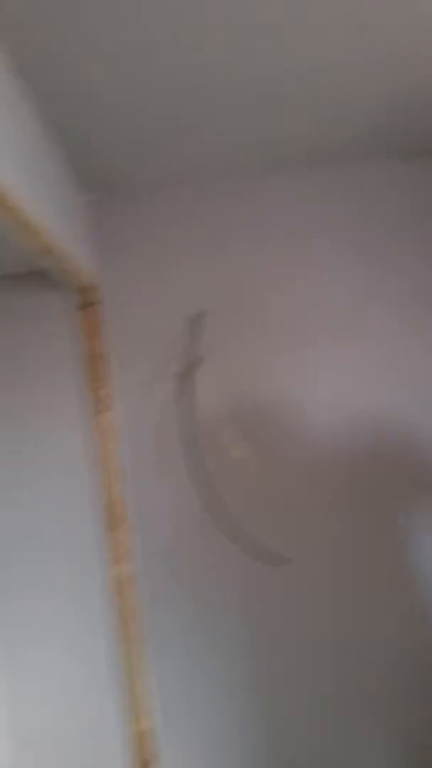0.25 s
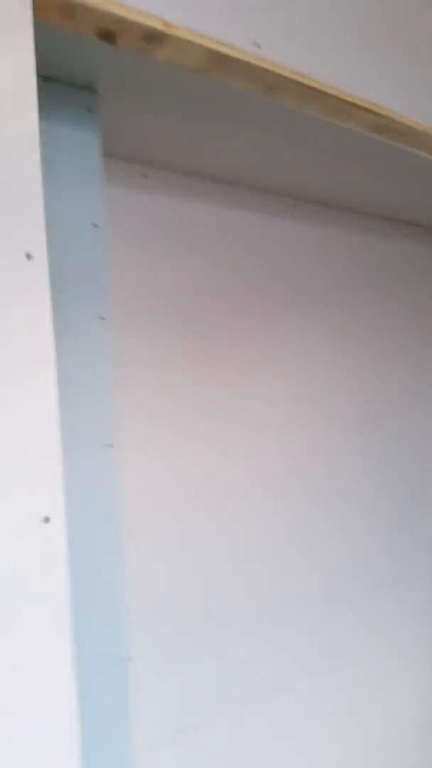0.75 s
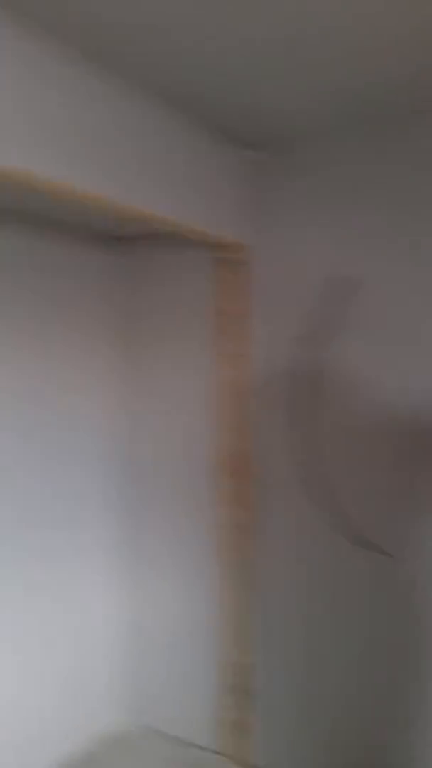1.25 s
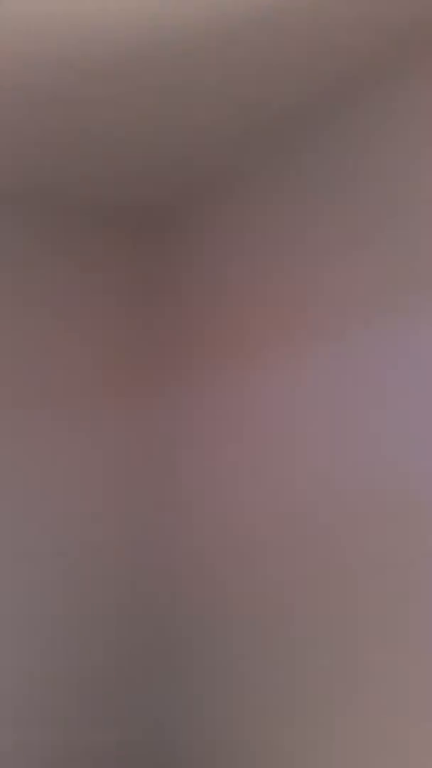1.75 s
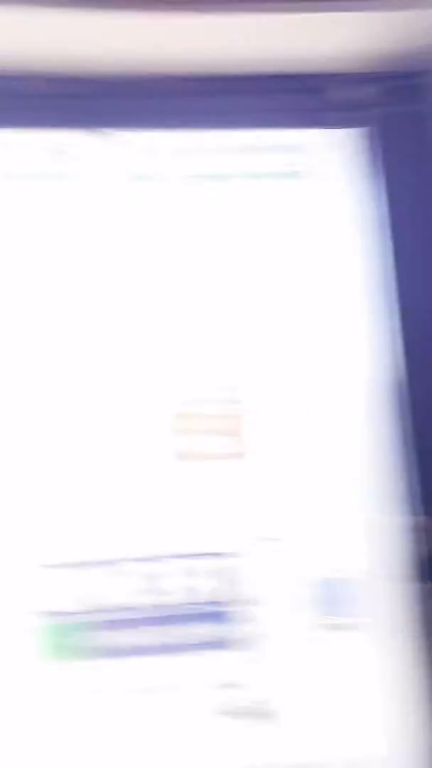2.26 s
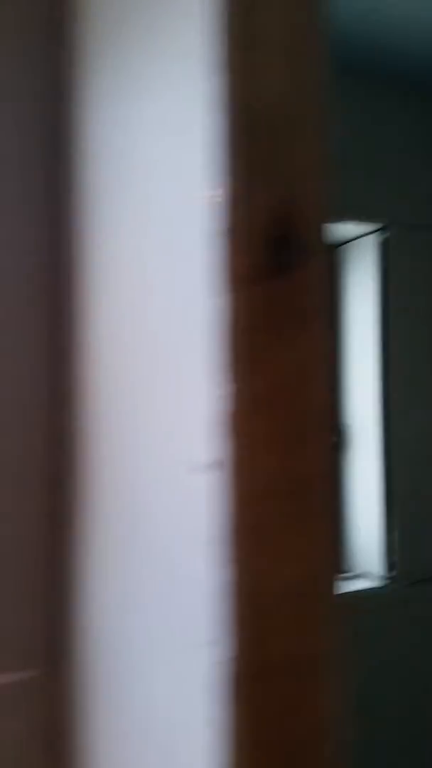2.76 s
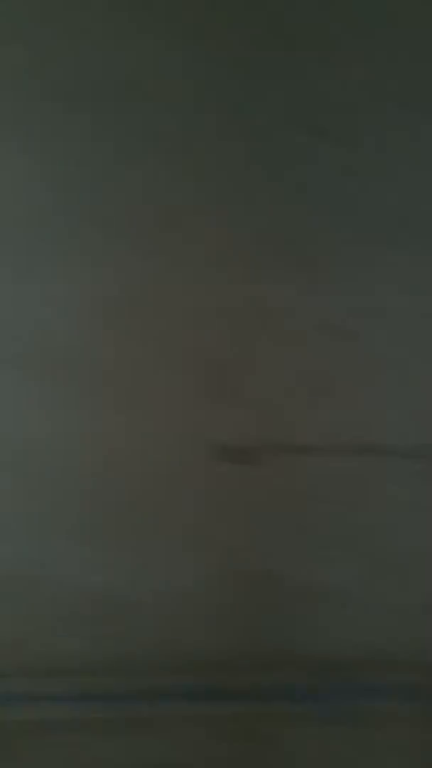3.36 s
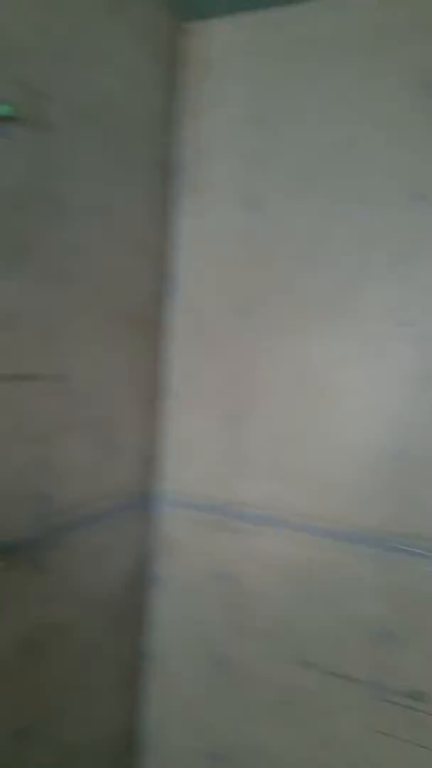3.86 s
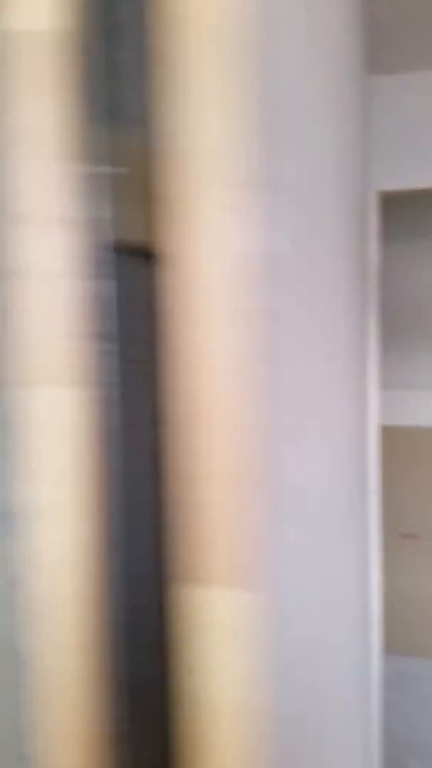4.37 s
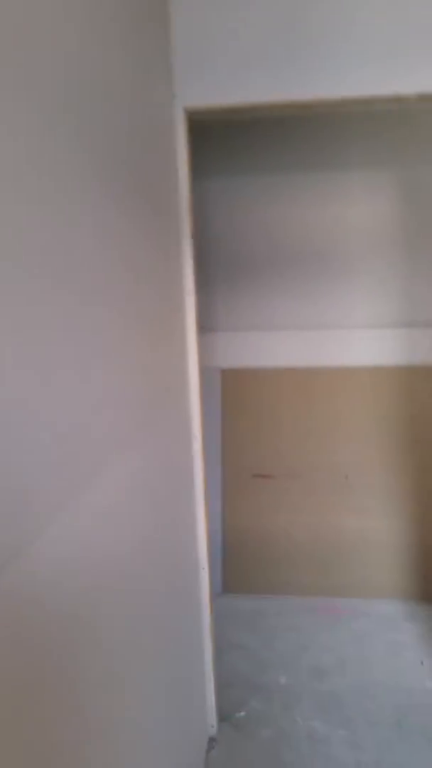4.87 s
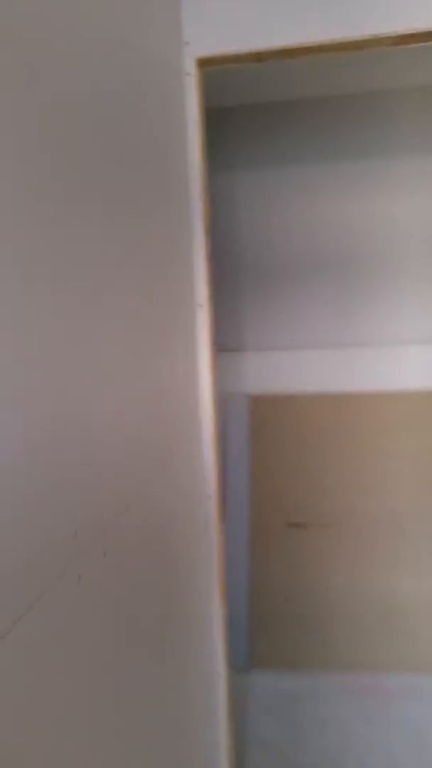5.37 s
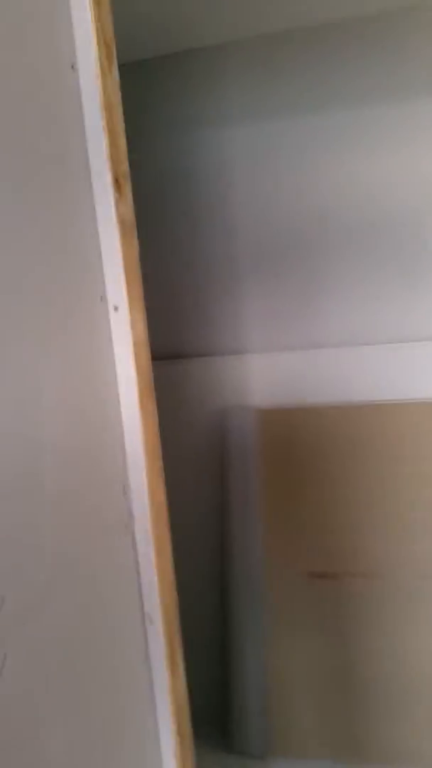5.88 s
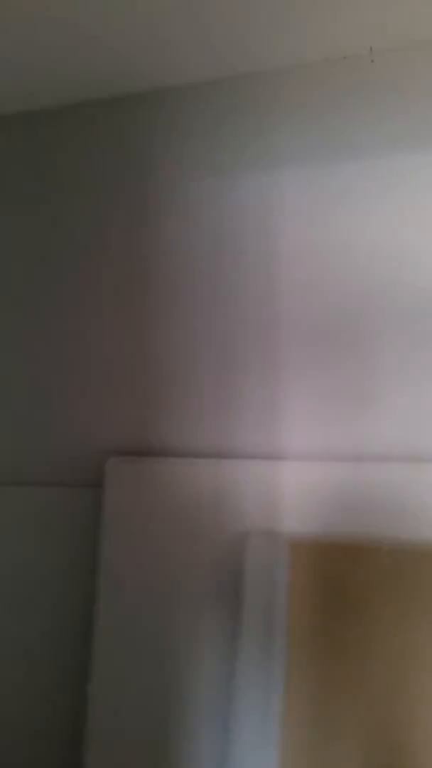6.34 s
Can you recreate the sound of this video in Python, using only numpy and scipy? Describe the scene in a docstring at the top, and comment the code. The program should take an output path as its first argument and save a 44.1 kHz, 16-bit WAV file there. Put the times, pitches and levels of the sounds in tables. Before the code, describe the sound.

A stiff broom sweeps a gritty concrete floor in the bare rooms of an unfinished building. The strokes come steadily, each a bright hiss of bristles with grit rasping underneath, many starting with a knock of the broom head. Shoe soles scuff nearby in between. Everything has a short, hard echo, and the moving hand-held microphone adds soft bumps and a low rumble.

```python
"""Stiff broom on gritty concrete

Bare, echoing rooms, heard from a hand-held stereo recorder on the move. The broom head knocks down,
then the bristle tips hiss along with grit rolling under them. Nearby, shoe soles catch and scuff.
Carrying puts bumps and rumble on the capsules, and the two microphone ports sound very different."""
import sys
import numpy as np
from scipy import signal
from scipy.fft import rfft, irfft
from scipy.io import wavfile

SR = 44100
rng = np.random.default_rng(int(sys.argv[2]) if len(sys.argv) > 2 else 0)


def inscribe(sig):
    """Save sig as 16-bit PCM at rate SR to the path in sys.argv[1].

    A 1-D sig is mono; a 2-D sig holds one channel per row.
    Samples are clipped to [-1, 1] before scaling.
    """
    pcm = np.round(np.clip(np.atleast_2d(sig).T, -1, 1) * 32767)
    wavfile.write(sys.argv[1], SR, pcm.astype(np.int16))


N = 291501


def sweeping():
    """Bristle tips slip and hiss over rolling grit; a stroke lands, swells with speed, fades on lifting."""
    # broom strokes: landing t/s, push length/s, landing hiss/dB, full-speed hiss/dB, full-speed grit/dB
    strokes = [(-0.1, 0.18, -10, -21.5, -30), (0.449, 0.25, -29.5, -23, -38),
               (1.073, 0.046, -69, -34, -36.5), (1.338, 0.34, -35.5, -21.5, -37.5),
               (2.017, 0.22, -41.5, -22.5, -32.5), (2.622, 0.14, -33.5, -29.5, -41),
               (3.183, 0.027, -82, -60, -53.5), (3.303, 0.092, -88, -54, -45),
               (3.437, 0.29, -38.5, -22, -43), (4.088, 0.02, -55, -51, -50.5),
               (4.106, 0.27, -36, -22, -41.5), (4.745, 0.065, -47, -37, -46),
               (4.815, 0.18, -33.5, -23, -40), (5.511, 0.34, -38, -25, -41), (6.205, 0.26, -42, -26, -37)]
    # bright spectrum of the bristle tips: f/Hz, level/dB
    bristle_spectrum = [(500, -49), (1500, -51), (3500, -12.5), (6000, -7.5), (10000, 3), (16000, 3)]
    # duller rasp of the rolling grains: f/Hz, level/dB
    grit_spectrum = [(200, -15), (800, -12), (1500, -6), (2200, -2), (3000, -3.5), (5000, -1),
                     (10000, -2.5)]
    hiss_fade_db_per_s, grit_fade_db_per_s = 129, 58
    snap_s, hiss_snap_db, grit_snap_db = 0.0053, 13, 16   # spatter as the bristles land
    grit_follows = 0.31   # share of the hiss's swell
    t = np.arange(N) / SR
    hiss_db, grit_db = np.zeros((2, N))
    for start_s, push_s, landing_db, full_db, rasp_db in strokes:
        landed = t >= start_s
        age = t[landed] - start_s
        # the push gains most of its speed early
        below_full_db = (full_db - landing_db) * np.maximum(1 - age / push_s, 0) ** 1.3
        lifted_s = np.maximum(age - push_s, 0)
        snap = np.exp(-age / snap_s)
        hiss_db[landed] = full_db - below_full_db - hiss_fade_db_per_s * lifted_s + hiss_snap_db * snap
        grit_db[landed] = (rasp_db - grit_follows * below_full_db
                           - grit_fade_db_per_s * lifted_s + grit_snap_db * snap)
    flicker = from_db(1.5 * drift(rate_hz=40))
    hiss = colour(grains(per_s=14000, spread_db=2.5), bristle_spectrum)
    grit = colour(grains(per_s=5000, spread_db=3.0), grit_spectrum)
    # each layer's level is set within one reference band
    hiss *= from_db(hiss_db) * flicker / np.std(band(hiss, 11840, 14600))
    grit *= from_db(grit_db + 0.5 * drift(rate_hz=18)) / np.std(band(grit, 1380, 4610))
    return hiss + grit


def knocks():
    """Broom head or shoe hits the floor: a sharp push, a rattle as it settles, a gritty crack on top."""
    # blows: t/s, thud level/dB, crack against thud/dB, boom against thud/dB
    blows = [(0.003, -19, -15, -20), (0.176, -20, 5, -13), (0.452, -5, -4, -12), (1.227, -25.5, -4, -12),
             (1.344, -28, -13, -4), (2.015, -6.5, -2.5, -10), (2.42, -22, 8, -6), (2.623, -2.5, -4.5, -11),
             (2.964, -27, -3, -3), (3.185, -24.5, 1.5, -32), (4.107, -7, -13, -8), (4.817, -14.5, 2, -3.5),
             (5.511, -15, 4, -16), (5.761, -19.5, -11, -13), (6.205, -13, 4, -8), (6.39, -21.5, -13, -1),
             (6.592, -15.5, 8.5, -12)]
    # thud of the blow: f/Hz, level/dB
    thud_spectrum = [(120, -2), (230, 1), (320, 6), (450, -0.5), (700, 2), (1000, -14.5), (1500, -7),
                     (2500, -27.5)]
    # boom of the slab under the weight: f/Hz, level/dB
    slab_spectrum = [(30, -41), (65, 7), (120, 3), (200, -12.5), (400, -31)]
    settle_s, rattle_shares = 0.0079, [[.5], [.5], [2]]   # rows: thud, boom, crack
    forces = np.zeros((3, N + SR))
    t = np.arange(round(.1 * SR)) / SR
    for start_s, thud_db, crack_db, boom_db in blows:
        rattle = np.exp(-t / settle_s) * rng.standard_normal((3, len(t))) / np.sqrt(settle_s * SR)
        blow = rattle * rattle_shares
        blow[:, 0] = 1   # the sharp push
        at = round(start_s * SR)
        forces[:, at:at + len(t)] += from_db(thud_db + np.array([[0], [boom_db], [crack_db]])) * blow
    bodies = (lambda x: colour(x, thud_spectrum),
              lambda x: colour(x, slab_spectrum),
              lambda x: band(x, 600, 5800))
    click = signal.unit_impulse(SR // 10)   # a unit push peaks at 1 in each body
    return sum(body(force[:N]) / np.max(np.abs(body(click))) for body, force in zip(bodies, forces))


def scuffs():
    """A nearby sole catches; grains chatter and echo in one rubber resonance. A narrow one squeaks."""
    # soles dragging over grit: t/s, length/s, level/dB, f/Hz, width/Hz
    drags = [(0.057, 0.068, -30.5, 3100, 2390), (0.208, 0.094, -28.5, 2010, 790),
             (0.232, 0.07, -25, 4470, 3040), (1.073, 0.16, -34, 3240, 2340), (1.689, 0.17, -39, 2170, 510),
             (1.796, 0.046, -38.5, 1530, 302), (1.894, 0.083, -35, 430, 380),
             (1.91, 0.091, -35, 2000, 2400), (2.16, 0.12, -28.5, 1860, 1600),
             (4.9, 0.13, -31.5, 3850, 3400), (5.862, 0.065, -40.5, 2240, 90),
             (5.818, 0.13, -36.5, 3700, 3030), (6.435, 0.026, -30.5, 2290, 200),
             (6.437, 0.042, -31, 2920, 3240), (6.585, 0.056, -23.5, 1540, 1600)]
    echo_t60_s, catch_share = 0.74, 0.23   # share of the length spent catching
    out = np.zeros((2, N + SR))
    t = np.arange(SR) / SR
    for start_s, length_s, level_db, hz, width_hz in drags:
        catch = np.minimum(t / (catch_share * length_s), 1)
        drag = catch * np.maximum(1 - (t / length_s) ** 2, 0)
        chatter = 0.48 * drag * rms_one(grains(per_s=2500, spread_db=4.0)[:SR])
        echo = np.sqrt(store(drag ** 2, echo_t60_s / np.log(1e6))) * rng.standard_normal((2, SR))
        rubber = band(chatter + echo, hz - width_hz / 2, hz + width_hz / 2)
        at = round(start_s * SR)
        out[:, at:at + SR] += from_db(level_db) * np.sqrt(SR / 2 / width_hz) * rubber
    return out[:, :N]


def rooms(source):
    """Direct sound plus a diffuse field; broom and recorder keep moving, so the echo is fresh noise."""
    # reverberation of the bare rooms: f/Hz, t60/s, left-right likeness (clipped to -1..1)
    reverb = [(60, 0.37, 0.92), (197, 0.62, 1), (397, 0.57, 0.71), (810, 0.91, 0.51), (1400, 0.61, -0.26),
              (3700, 0.46, 0.024), (7700, 0.42, -1.08), (14400, 0.068, 0.57)]
    # standing waves: f/Hz, width/Hz, gain/dB
    standing_waves = [(83, 37, 4.5), (118, 6.6, 0), (149.8, 5.5, 7), (226, 40, 7.5), (314, 11, 0.5),
                      (415, 86, 4)]
    direct_db, build_up_s, max_lag_s = -9, 0.0027, 0.00042
    edges_hz = 30 * 2 ** np.arange(0, 9.6, .5)   # half octaves
    white = rng.standard_normal((2, 2, N))
    field = np.zeros((2, N))
    for k, (low, high) in enumerate(zip(edges_hz, np.minimum(edges_hz[1:], .47 * SR))):
        hz = np.sqrt(low * high)
        # each band stores the energy it is fed and lets it die at its own rate
        fed = store(band(source, low, high) ** 2, build_up_s)
        energy = store(fed, at_hz(reverb, hz) / np.log(1e6))
        mid, side = band(white[k % 2], low, high)
        alike = np.clip(at_hz(reverb, hz, column=2), -1, 1)
        pair = np.sqrt(1 + alike) * mid + np.sqrt(1 - alike) * side * [[1], [-1]]
        field += rms_one(pair) * np.sqrt(energy)
    for hz, width_hz, gain_db in standing_waves:
        b, a = signal.iirpeak(hz, hz / width_hz, fs=SR)
        field += (from_db(gain_db) - 1) * signal.lfilter(b, a, field)
    # as the hand turns, either port may be the nearer
    lag = np.round(max_lag_s * SR * np.tanh(drift(rate_hz=1.0)))
    samples = np.arange(N)
    direct = np.array([source, np.interp(samples - lag, samples, source)])
    return field + from_db(direct_db) * direct


def handling():
    """Dry finger bumps reach the capsules through the casing, over the lumpy rumble of carrying."""
    # fingers shifting on the casing: t/s, level/dB, f/Hz, left against right/dB
    finger_bumps = [(0.949, -43, 106, -14), (1.289, -28, 286, -12), (3.448, -33, 59.5, 0.5),
                    (3.516, -38.5, 96, 9), (3.857, -40, 102, -9), (4.991, -32.5, 91, -10),
                    (5.09, -35, 123, -28), (5.276, -26.5, 192, 1), (5.341, -37, 57.4, -10),
                    (6.142, -35.5, 65, -24), (6.428, -28, 110, 9)]
    # course of the carrying rumble: t/s, level/dB
    rumble_levels = [(0.0, -78), (0.72, -39), (0.9, -55.5), (1.948, -57), (2.13, -53), (2.83, -44),
                     (3.13, -51.5), (3.75, -50.5), (4.05, -70), (4.2, -44), (5.38, -47), (5.47, -52.5),
                     (5.55, -45.5), (6.08, -48.5), (6.25, -48), (6.61, -38.5)]
    # spectrum of the carrying rumble: f/Hz, level/dB
    rumble_spectrum = [(20, -2), (40, 0.5), (90, -2.5), (200, -10), (500, -7.5), (1500, -21)]
    ring_cycles = 4.7   # to fall by 60 dB
    bumps = np.zeros((2, N))
    t = np.arange(round(.06 * SR)) / SR
    for start_s, level_db, hz, pan_db in finger_bumps:
        bump = np.sin(2 * np.pi * hz * t) * from_db(level_db) * 1000 ** (-t * hz / ring_cycles)
        at = round(start_s * SR)
        bumps[:, at:at + len(t)] += bump * from_db([[pan_db / 2], [-pan_db / 2]])
    shared, left, right = (colour(rng.standard_normal(N), rumble_spectrum) for _ in range(3))
    times_s, rumble_db = np.transpose(rumble_levels)
    lumps = from_db(np.interp(np.arange(N) / SR, times_s, rumble_db) + 2.5 * drift(rate_hz=12))
    return bumps + lumps * rms_one(shared + 1.4 * np.array([left, right]))


def grains(per_s, spread_db):
    """Random slips of uneven size and sign."""
    sizes = from_db(spread_db * np.minimum(rng.exponential(1, N), 5)) * rng.choice([-1, 1], N)
    return sizes * (rng.random(N) < per_s / SR)


def drift(rate_hz):
    """Slow random wander with an rms of about 1."""
    hop, run_in = 40, 2000
    pole = np.exp(-2 * np.pi * rate_hz * hop / SR)
    white = rng.standard_normal(N // hop + run_in + 2)
    slow = signal.lfilter([1], [1, -2 * pole, pole * pole], white)[run_in:]
    return np.interp(np.arange(N) / hop, np.arange(len(slow)), rms_one(slow))


def store(power, seconds):
    """Energy flows in and leaks out with the given time constant."""
    keep = np.exp(-1 / (seconds * SR))
    return signal.lfilter([1 - keep], [1, -keep], power)


def colour(x, spectrum, column=1):
    """Causal filter with the given spectrum: minimum phase by folding the cepstrum."""
    size = 4096
    gain = from_db(at_hz(spectrum, np.fft.rfftfreq(size, 1 / SR), column))
    cepstrum = irfft(np.log(gain))
    cepstrum[1:size // 2] *= 2
    cepstrum[size // 2 + 1:] = 0
    return signal.fftconvolve(x, irfft(np.exp(rfft(cepstrum))))[:len(x)]


def band(x, low_hz, high_hz):
    """Band-pass filter."""
    return signal.sosfilt(signal.butter(2, [low_hz, high_hz], "band", fs=SR, output="sos"), x)


def at_hz(table, hz, column=1):
    """Reads a table on a log-frequency axis."""
    rows = np.array(table)
    return np.interp(np.log(np.maximum(hz, 1)), np.log(rows[:, 0]), rows[:, column])


def from_db(db):
    """Gain of a level in dB."""
    return 10 ** (np.asarray(db) / 20)


def rms_one(x):
    """Scales to an rms of 1."""
    return x / np.sqrt(np.mean(x ** 2) + 1e-20)


def scene():
    """Strokes and knocks fill the rooms; scuffs carry their own echo; handling is dry on the capsules."""
    return rooms(sweeping() + knocks()) + scuffs() + handling()


def record(dry):
    """The hand-held recorder: each microphone port colours its channel, and the top is cut steeply."""
    # response of the microphone ports: f/Hz, left level/dB, right level/dB
    ports = [(101, 4.5, 5.5), (570, 4.5, -0.5), (860, 6.5, -2), (2260, 4.5, 1.5), (2870, 4, -8.5),
             (4170, 2, -9), (5280, 2, -18.5), (6980, 6.5, -25), (8120, -8, -27), (9440, -21.5, -26),
             (11850, -13, -8.5), (15200, -12, -4)]
    cutoff_hz = 15720
    ported = np.array([colour(dry[0], ports, column=1), colour(dry[1], ports, column=2)])
    return signal.sosfilt(signal.ellip(12, .5, 60, cutoff_hz, fs=SR, output="sos"), ported)


dry = scene()
out = record(dry)
inscribe(out)
```